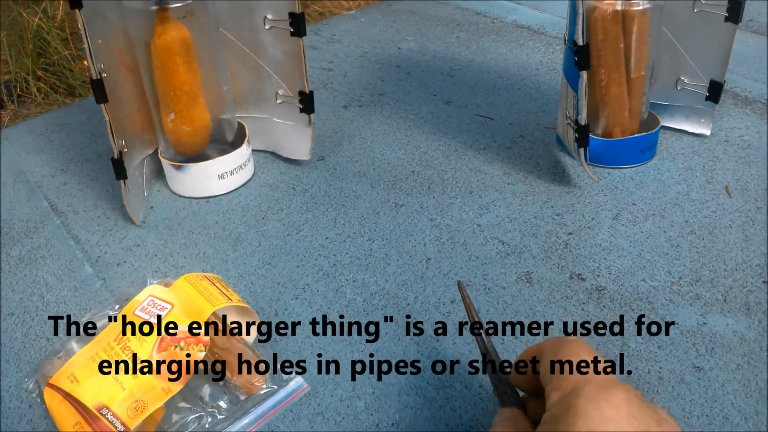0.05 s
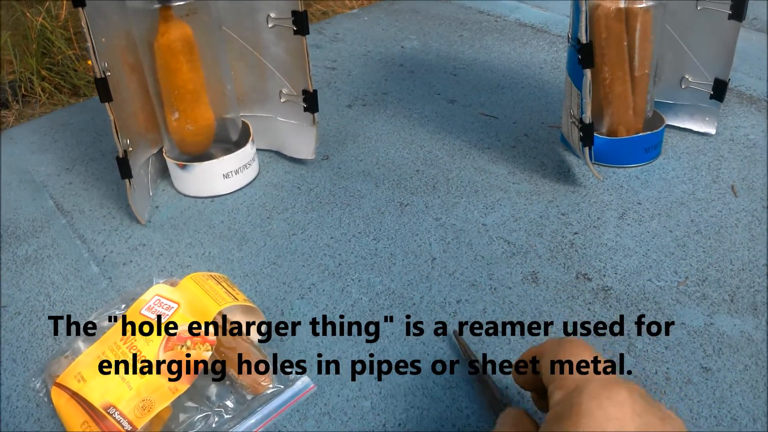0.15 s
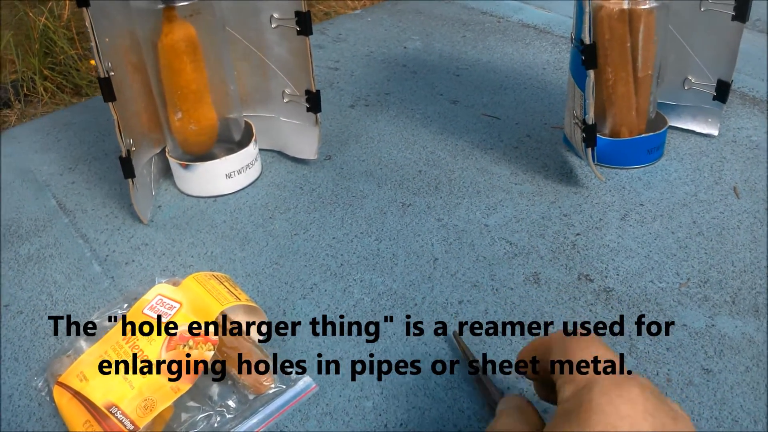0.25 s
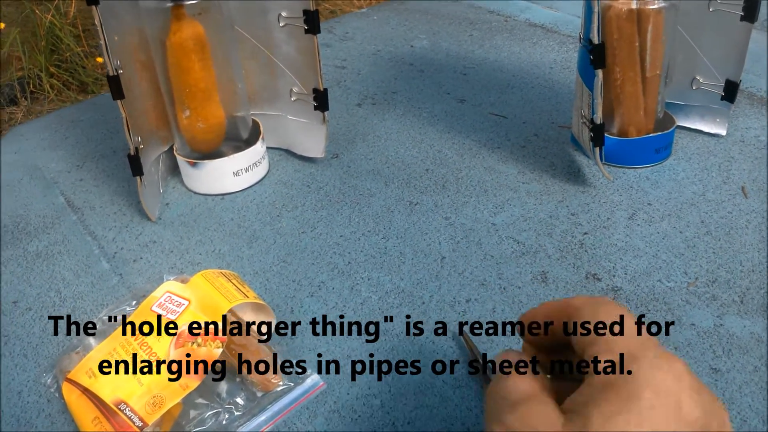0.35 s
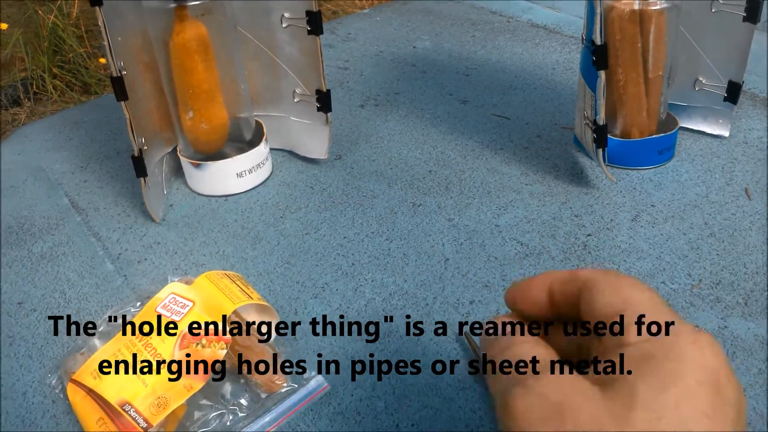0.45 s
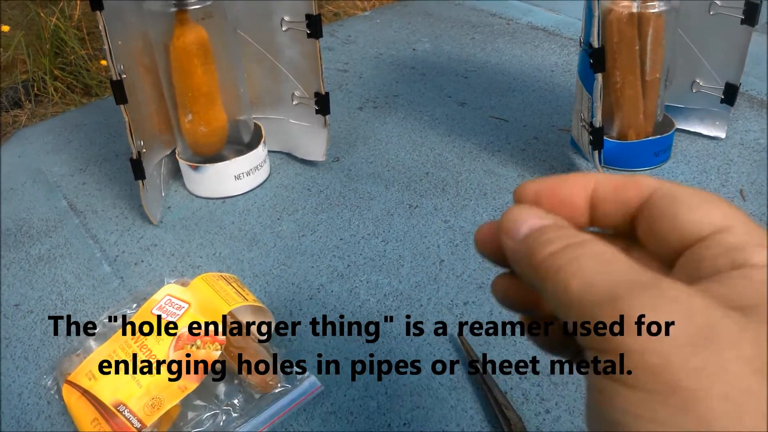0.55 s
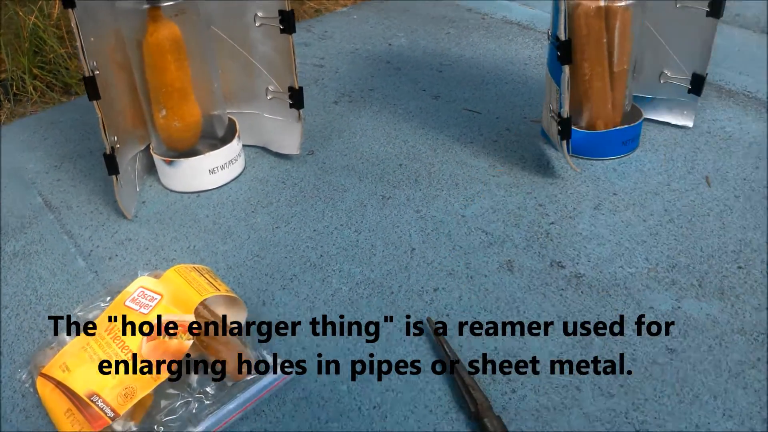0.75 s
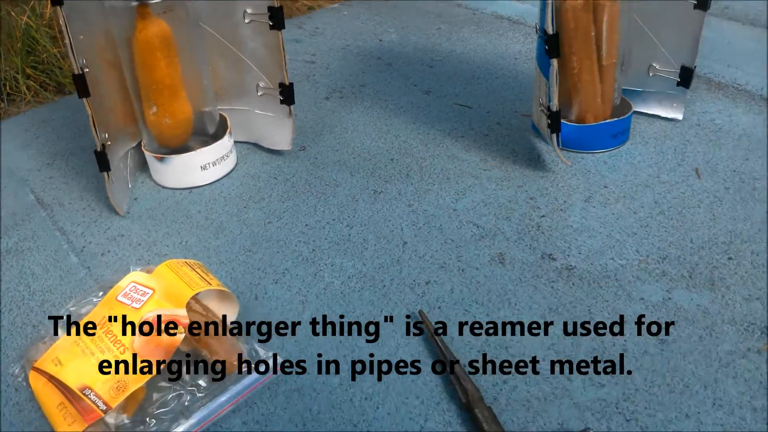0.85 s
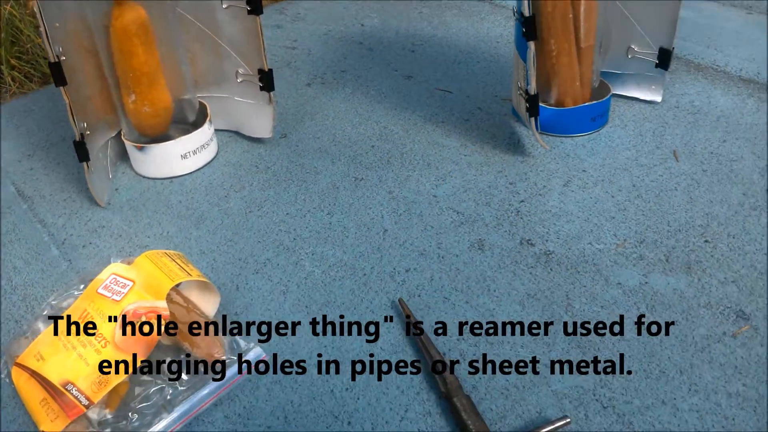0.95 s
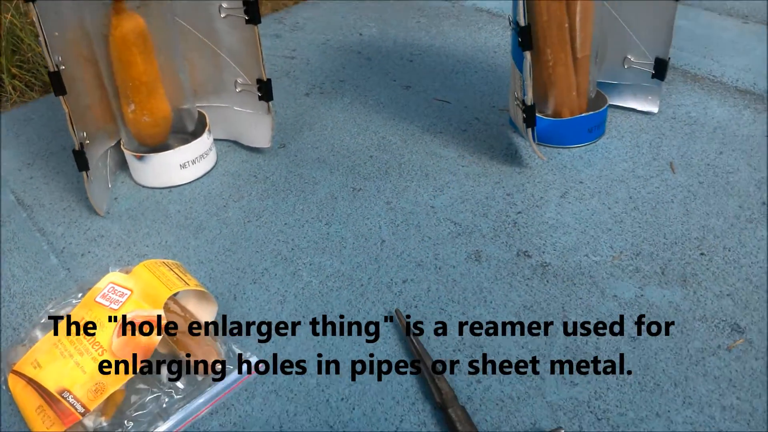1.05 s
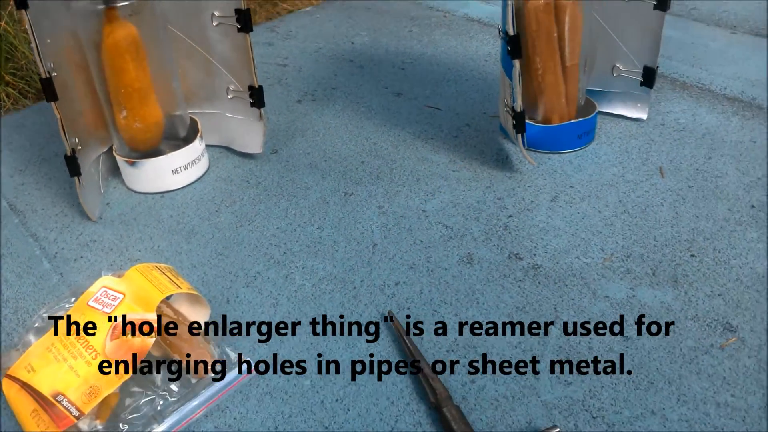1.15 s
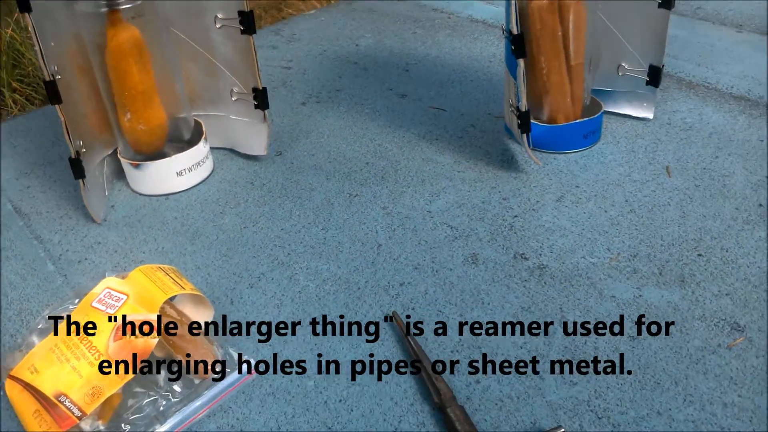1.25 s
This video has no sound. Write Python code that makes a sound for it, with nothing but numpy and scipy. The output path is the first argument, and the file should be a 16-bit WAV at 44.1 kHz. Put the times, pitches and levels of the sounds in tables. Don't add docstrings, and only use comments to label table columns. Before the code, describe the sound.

A steel hand tool is laid on a hollow padded outdoor table with a hard knock and small bounces

```python
import sys
import numpy as np
from scipy import signal
from scipy.fft import rfft, irfft, next_fast_len
from scipy.io import wavfile
from scipy.ndimage import map_coordinates

SR = 44100
rng = np.random.default_rng(int(sys.argv[2]) if len(sys.argv) > 2 else 0)


def decibels_to_gain(level_db):
    exponent = np.asarray(level_db, float) / 20
    return 10 ** exponent


def generate_wav(signal):
    frames = np.transpose(np.atleast_2d(signal))
    scaled = np.clip(frames, -1, 1) * 32767
    pcm = np.round(scaled).astype(np.int16)
    wavfile.write(sys.argv[1], SR, pcm)


N = 57330


def unit(x):
    return x / np.sqrt(np.mean(x ** 2) + 1e-20)


def along(points, hz):
    f, v = np.transpose(points)
    return np.interp(np.log(hz + 1), np.log(f + 1), v)


def curves(rows):
    s, *cols = np.transpose(rows)
    return [np.interp(np.arange(N) / SR, s, c) for c in cols]


def wobble(rate):
    knots = rng.standard_normal(N // 8)[:int(N * rate / SR) + 4]
    return map_coordinates(knots, [np.arange(N) * rate / SR])


def filtered(x, response):
    m = next_fast_len(len(x) + SR // 2)
    return irfft(rfft(x, m) * response(np.fft.rfftfreq(m, 1 / SR)), m)[:len(x)]


def band(hz, width_hz):
    def resonance(f):
        damping = 1j * f * width_hz
        return (damping / (hz * hz - f * f + damping)) ** 2
    return unit(filtered(rng.standard_normal(N), resonance))


# pitch_hz, level_db (per Hz)
AIR_TONE = [(15, -51.5), (40, -8.5), (100, -4.5), (330, -13), (900, -24), (2800, -39), (9000, -49),
            (16000, -52)]
# start_s, level_db
AIR_LEVEL = [(0, -50.5), (.5, -52.5), (.8, -52), (1.3, -52.5)]


def traffic_air():
    level_db, = curves(AIR_LEVEL)
    level = decibels_to_gain(level_db + 0.56 * wobble(7.4))
    return level * unit(filtered(rng.standard_normal(N), lambda f: decibels_to_gain(along(AIR_TONE, f))))


def machine_hum():
    turn = 2 * np.pi * np.cumsum(119 + 3 * wobble(11.9)) / SR
    tone = decibels_to_gain(1.5 * wobble(14)) * np.sin(turn)
    hum = decibels_to_gain(-50) * (tone + .3 * band(119, width_hz=25))
    return hum + decibels_to_gain(-63) * band(254, width_hz=17)


def insect_chorus():
    shimmer = decibels_to_gain(-77 + 2.3 * wobble(33)) * band(5220, width_hz=2200)
    line = decibels_to_gain(-90 + 1.6 * wobble(9.4)) * band(4020, width_hz=90)
    return shimmer + line


def bird(call, strands, flutter_hz, patchy_db, echo_s, wet_db):
    pitch_hz, level_db = curves(call)
    s = np.arange(N) / SR
    voice = np.zeros(N)
    for ratio, db in strands:
        strand_level = decibels_to_gain(db + patchy_db * wobble(60))
        strand_hz = ratio * pitch_hz + flutter_hz * wobble(300)
        voice += strand_level * np.sin(2 * np.pi * np.cumsum(strand_hz) / SR)
    voice *= decibels_to_gain(level_db) * (s > call[0][0]) * (s < call[-1][0])
    t = np.arange(SR // 3) / SR
    echo = rng.standard_normal(len(t)) * decibels_to_gain(-60 * t / echo_s)
    return voice + decibels_to_gain(wet_db) * signal.fftconvolve(voice, echo / np.linalg.norm(echo))[:N]


# start_s, pitch_hz, level_db
ARCHED_CALL = [(.53, 4500, -95), (.54, 4700, -77), (.56, 5250, -74.5), (.64, 5600, -74), (.68, 5450, -76),
               (.72, 5150, -79), (.77, 4900, -83), (.79, 4800, -98)]
# pitch_ratio, level_db
ARCHED_STRANDS = [(1, 0), (.91, -1), (.81, -2)]
# start_s, pitch_hz, level_db
THIN_CALL = [(.82, 7400, -98), (.84, 7450, -80), (.91, 7550, -82), (.95, 7750, -89), (1.04, 7900, -87),
             (1.11, 7750, -88), (1.2, 7800, -96)]


def birds():
    arched = bird(ARCHED_CALL, ARCHED_STRANDS, flutter_hz=190, patchy_db=2.5, echo_s=.1, wet_db=1.5)
    return arched + bird(THIN_CALL, [(1, 0)], flutter_hz=130, patchy_db=2, echo_s=.1, wet_db=2)


# start_s, level_db (peak)
INSECT_TICKS = [(0.0792, -47), (0.1274, -60), (0.1565, -52), (0.3604, -59), (0.4245, -52.5),
                (0.4923, -46.5), (0.8265, -49), (0.8904, -49), (0.9582, -45), (1.0246, -50), (1.1174, -50)]


def ticks():
    t60_s, rise_s, gain_db = 0.0042, 0.00093, 2
    out, t = np.zeros(N + SR), np.arange(SR // 40) / SR
    for s, db in INSECT_TICKS:
        hz = 5060 * np.exp(0.026 * rng.standard_normal())
        level = decibels_to_gain(db + gain_db - 60 * t / t60_s) * (1 - np.exp(-t / rise_s))
        out[round(s * SR):][:len(t)] += level * np.sin(2 * np.pi * hz * t)
    return out[:N]


# start_s, level_db, centre_hz, width_hz, t60_s
STEEL_CLACKS = [
    (0.1706, -47.5, 3400, 5000, 0.09),
    (0.2295, -34, 4630, 6000, 0.097),
    (0.2643, -42, 5500, 8000, 0.044),
    (0.284, -58.5, 6400, 2000, 0.14),
    (0.3351, -55.5, 5600, 4850, 0.08),
]


def steel():
    out, t = np.zeros(N + SR), np.arange(SR // 8) / SR
    for s, db, hz, width_hz, t60_s in STEEL_CLACKS:
        grain = decibels_to_gain(2.2 * wobble(400)) * band(hz, width_hz)
        level = decibels_to_gain(db - 60 * t / t60_s) * (1 - np.exp(-t / .0003))
        out[round(s * SR):][:len(t)] += level * grain[:len(t)]
    return out[:N]


def crack():
    start_s, push_s, spit_t60_s, spit_low_hz = .2281, .0003, .012, 6000
    t = np.maximum(np.arange(N) / SR - start_s, 0)
    spit = (t > 0) * decibels_to_gain(-57 - 60 * t / spit_t60_s) * rng.standard_normal(N)
    u = t / push_s
    push = decibels_to_gain(-11) * u ** 2 * (3 - u) * np.exp(-u)
    return push + filtered(spit, lambda f: (1j * f / (spit_low_hz + 1j * f)) ** 2)


def hollow(t):
    main_hz, lower_hz, lower_db, wander_hz = 290.2, 256, -4, 5
    rise_s, fade_s = 0.02, .13
    turn = 2 * np.pi * np.cumsum(main_hz + wander_hz * wobble(25.6)[:len(t)]) / SR
    swell = np.exp(-(t / fade_s) ** 2) * (1 - np.exp(-t / rise_s))
    return swell * (np.sin(turn) + decibels_to_gain(lower_db) * np.sin(turn * lower_hz / main_hz))


# pitch_hz, level_db
SMALL_MODES = [(50, -6.5), (90, -3), (300, -14.5), (1000, -14), (1800, -19), (4000, -20), (7500, -50),
               (11000, -61)]
# pitch_hz, t60_s
SMALL_MODES_T60 = [(60, 0.69), (300, 0.64), (1000, 0.31), (2900, 0.099), (7700, 0.04)]


def dense_ring(size):
    grid = dict(fs=SR, nperseg=256, noverlap=192)
    hz, t, z = signal.stft(rng.standard_normal(size), **grid)
    z = z * decibels_to_gain(along(SMALL_MODES, hz))[:, None]
    level = np.sqrt(np.mean(signal.istft(z, **grid)[1] ** 2))
    t60_s = np.maximum(along(SMALL_MODES_T60, hz), .01)
    dying = decibels_to_gain(-60 * t / t60_s[:, None])
    return signal.istft(z * dying, **grid)[1][:size] / level


# pitch_hz, level_db, t60_s
TOP_MODES = [(93.7, -6, 1), (117.8, 7.5, 0.16), (162.2, -0.5, 0.2), (189.1, 0.5, 0.28), (241.7, -3.5, 0.15),
             (374, -37, 0.18), (483.3, -1.5, 0.26), (567, -14.5, 0.49), (662.8, -5, 0.15),
             (822.6, -2.5, 0.23), (910.5, -4, 0.44), (972.3, 1, 0.19), (1139, 1, 0.12),
             (1547, -11.5, 0.099)]
# start_s, small_modes_db, strong_modes_db, hardness_hz, rise_s
TABLE_CONTACTS = [
    (0.0, -32, -31.5, 418, .002),
    (0.087, -33.5, -33, 1295, .02),
    (0.1705, -33.5, -39, 1850, .0004),
    (0.2280, -14, -10.5, 2366, 0.0006),
    (0.2644, -34, -42, 3730, .0004),
    (0.285, -38.5, -44.5, 3870, .002),
    (0.3331, -37, -31.5, 2510, 0.00076),
]


def table():
    out, t = np.zeros(N + SR), np.arange(SR * 3 // 4) / SR
    hz, level_db, t60_s = np.transpose(TOP_MODES)[:, :, None]
    t60_s = np.where(hz > 350, np.minimum(t60_s, .27), t60_s)
    scatter_db = 1
    for s, small_db, strong_db, hard_hz, rise_s in TABLE_CONTACTS:
        spot_db = scatter_db * rng.standard_normal((len(TOP_MODES), 1))
        modes = decibels_to_gain(level_db + spot_db - 60 * t / t60_s) * np.sin(2 * np.pi * hz * t)
        strong = (np.sum(modes, axis=0) + hollow(t)) / 3
        ring = decibels_to_gain(strong_db) * strong + decibels_to_gain(small_db) * dense_ring(len(t))
        ring *= 1 - np.exp(-t / max(rise_s, 1e-4))
        softened = filtered(ring, lambda f: 1 / (1 + 1j * f / hard_hz) ** 2)
        out[max(round(s * SR), 0):][:len(t)] += softened
    return out[:N]


def radiated(x):
    low_hz, high_hz = 60, 7530
    return filtered(x, lambda f: (1j * f / (low_hz + 1j * f)) ** 4 / (1 + (f / high_hz) ** 8))


def scene():
    whistles = birds()
    knocks = radiated(table() + steel())
    surroundings = traffic_air() + machine_hum() + insect_chorus()
    return (knocks + surroundings + whistles + ticks() + crack())[None]


def top_cut(x):
    return signal.sosfilt(signal.butter(12, 16450, fs=SR, output="sos"), x)


def record(dry):
    mix = filtered(dry[0], lambda f: f < 15790)[None]
    return top_cut(mix)


dry = scene()
out = record(dry)
generate_wav(out)
```